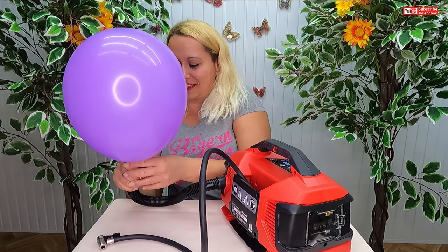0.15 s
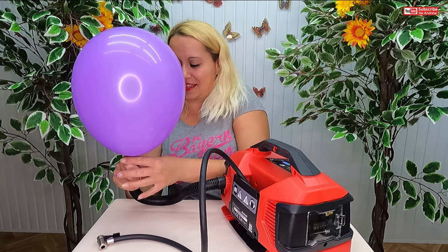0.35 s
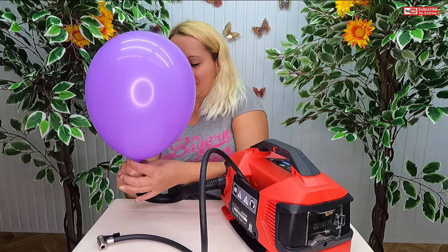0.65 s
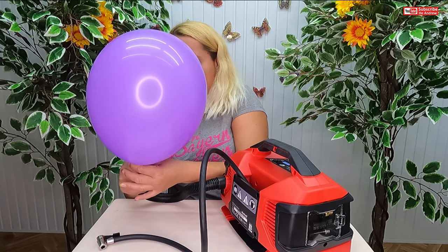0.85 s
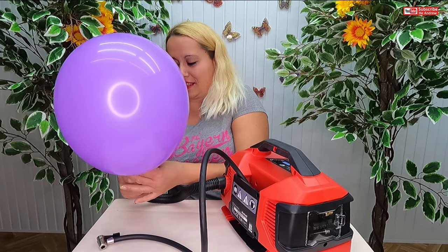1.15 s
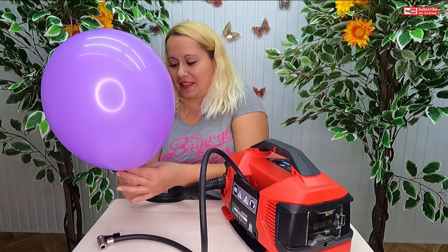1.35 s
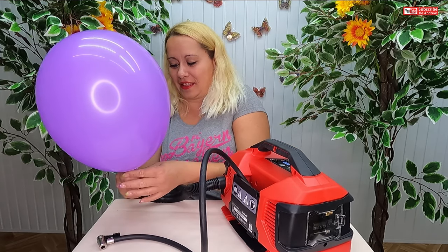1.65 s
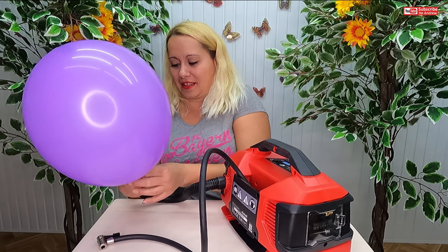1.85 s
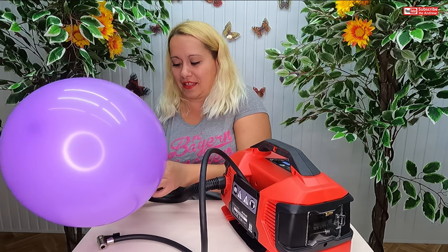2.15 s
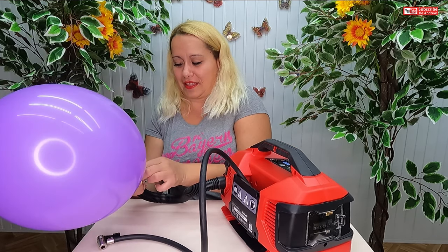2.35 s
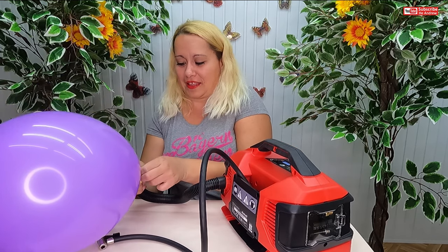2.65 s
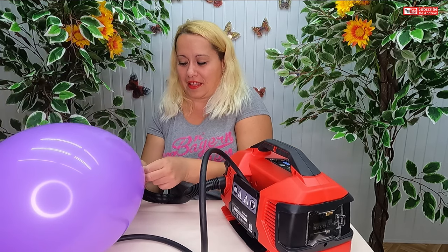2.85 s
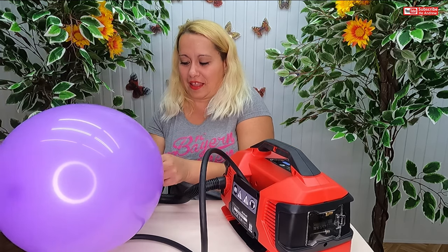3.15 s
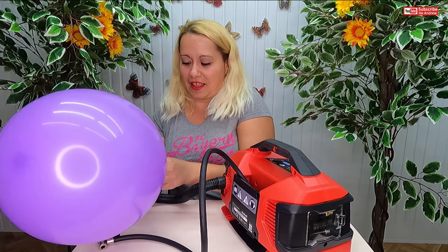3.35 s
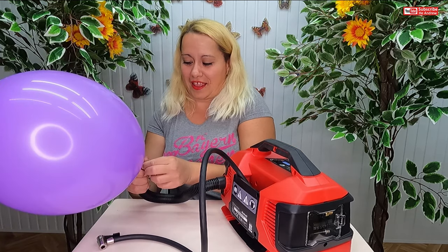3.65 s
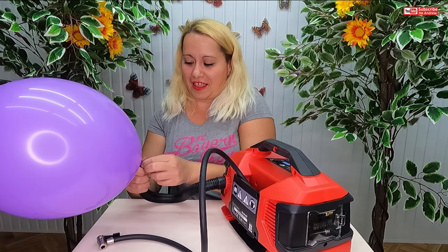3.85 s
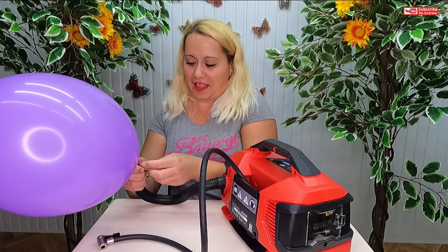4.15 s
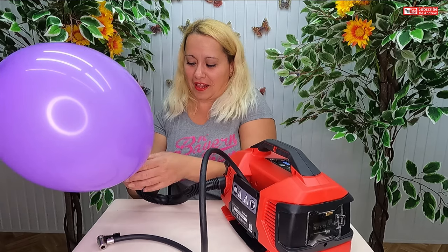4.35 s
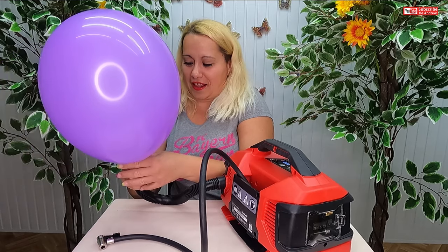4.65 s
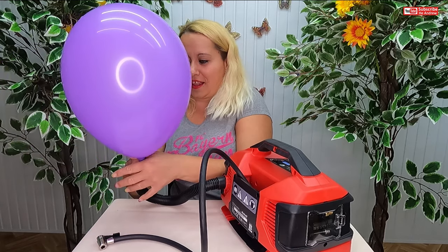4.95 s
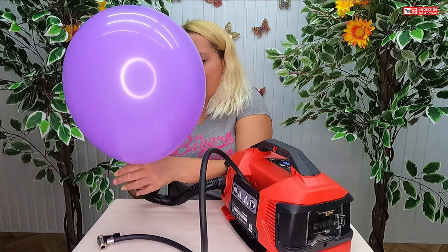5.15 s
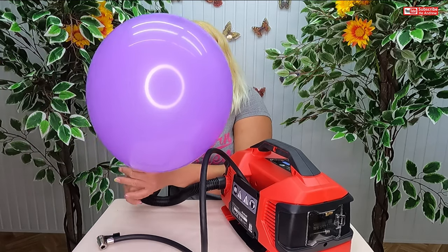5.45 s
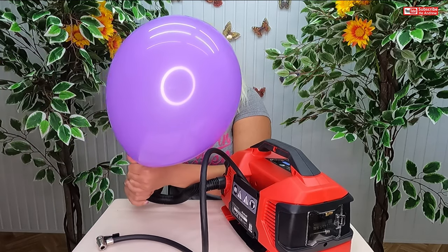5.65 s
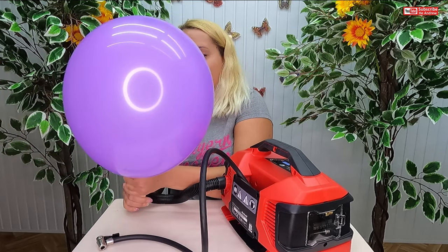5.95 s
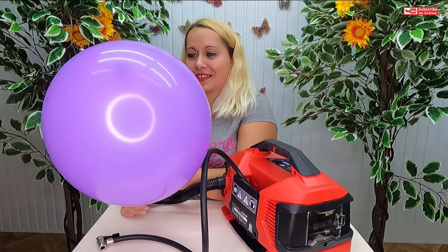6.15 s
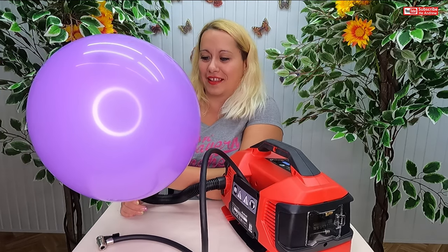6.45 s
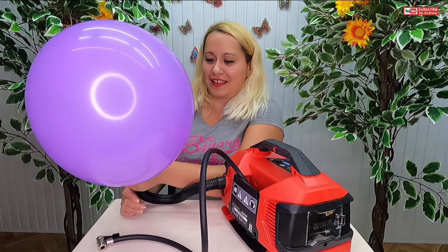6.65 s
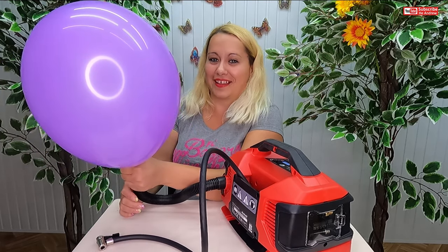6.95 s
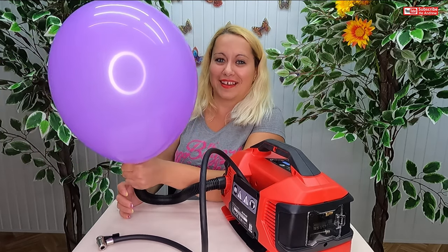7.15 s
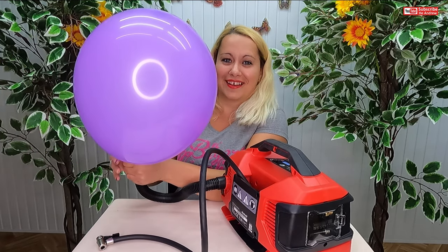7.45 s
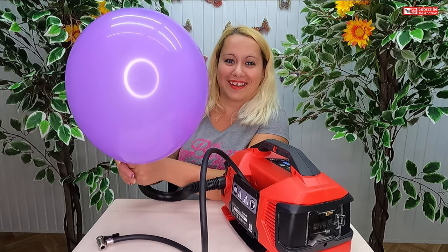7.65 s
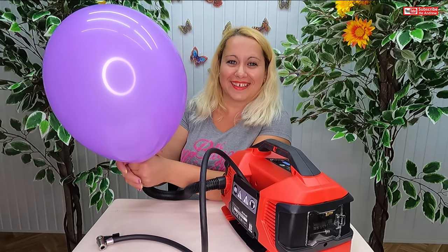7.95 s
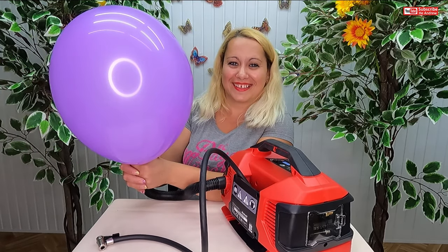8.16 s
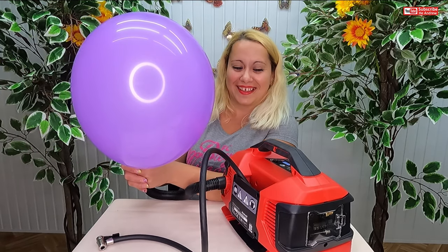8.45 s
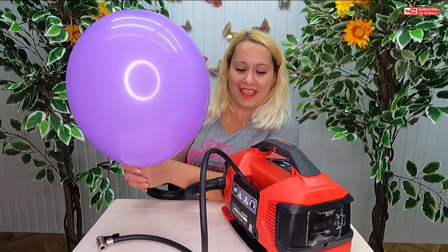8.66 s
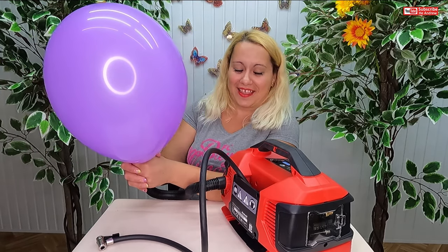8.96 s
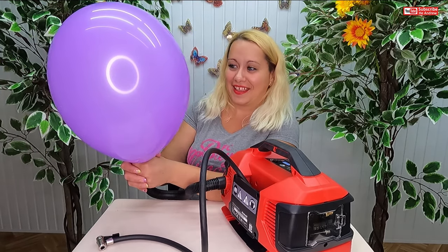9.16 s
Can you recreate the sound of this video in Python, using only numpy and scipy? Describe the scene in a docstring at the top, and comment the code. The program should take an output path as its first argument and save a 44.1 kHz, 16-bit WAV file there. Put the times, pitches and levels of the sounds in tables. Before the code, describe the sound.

From 0 to about 9.3 seconds an electric blower pump runs without a break on a table indoors, inflating a balloon. A dense, hollow roar of air, strongest in the low middle range, carries a steady motor hum near 336 Hz with rough overtones. Above it sits a thin whine near 2.7 kHz and a more piercing one near 8 kHz, wavering in strength: strong around 3.4 and 5.2 seconds, briefly dropping near 5.4, 6.6 and 7.3. From about 2.7 seconds the pitch creeps up almost imperceptibly. Faint neck hiss ebbs and returns, clearest around 2.3 to 4.5 and 6.4 to 6.7 seconds. Very soft, dull bumps fall near 1.5, 2.1, 3.4, 5 and 5.6, the fullest at 6.3 seconds. The sound is close, centred and nearly mono, with no fade or shutdown.

```python
"""A cordless blower pump runs on a table indoors and fills a latex balloon through a wide hose.
Its shaft hums and its eight-bladed impeller whines: tones tied to one shaft speed.
Air roars through housing and hose: noise shaped by resonances and by reflections off the table.
The swaying balloon reflects and shades the sound, hisses at its neck and bumps softly now and then."""
import sys
import numpy as np
from scipy import signal
from scipy.fft import rfft, irfft
from scipy.io import wavfile
from scipy.ndimage import uniform_filter1d

SR = 44100
rng = np.random.default_rng(int(sys.argv[2]) if len(sys.argv) > 2 else 0)


def master_out(mix):
    """Clip the mix to full scale and print it as 16-bit PCM to the path in sys.argv[1]."""
    frames = np.transpose(np.atleast_2d(mix))
    ceiling = np.clip(frames, -1, 1)
    pcm = np.round(ceiling * 32767).astype(np.int16)
    wavfile.write(sys.argv[1], SR, pcm)


N = 410571
TIME = np.arange(N) / SR  # seconds

# soft bumps of balloon and hose; the sway level is the one its fading starts from:
# (time [s], sway level [dB], sway pitch [Hz], sway decay [s], strongest thud [dB])
BUMP_EVENTS = [(1.46, -78, 50, .02, -75), (2.14, -65, 5.5, .15, -86), (3.36, -61, 18, 0.1, -84),
               (4.86, -77, 32, .08, -79), (5.03, -68, 15, .15, -86), (5.57, -63, 20, 0.046, -67),
               (5.64, -69, 20, .06, -71), (6.28, -53, 18, 0.13, -65)]
# air slipping past the neck of the balloon as the grip of the fingers changes: (time [s], level change [dB])
NECK_LEAK = [(0, 2), (.3, -25), (1.7, -7), (2.35, 3.5), (2.55, -13), (2.85, 1), (3.55, -9), (3.7, 1),
             (4, -5), (4.3, 1), (4.7, -20), (5.5, -4), (5.85, -16), (6.35, 0.5), (6.65, 1.5), (6.9, -11),
             (8, -18), (9.3, -13)]
# basic colour of that hiss: (frequency [Hz], level [dB per Hz])
NECK_LEAK_COLOUR = [(1000, -125), (4000, -108), (5700, -100), (7500, -103), (9700, -101), (11000, -110),
                    (15500, -114)]
# basic colour of the air rushing through the pump: (frequency [Hz], level [dB per Hz])
RUSH_COLOUR = [(30, -112), (90, -113), (125, -106), (170, -87), (265, -84), (385, -92.5), (550, -78.5),
               (730, -83.5), (1200, -93), (2200, -101), (5200, -103.5), (9000, -103), (11000, -109),
               (15500, -116)]
# resonances of housing and hose, and notches from reflections off the table:
# (frequency [Hz], width [Hz], lift [dB])
PEAKS_AND_NOTCHES = [(830, 35.3, 14.5), (960, 50, -1), (1077, 200, 11), (1205, 63, -7), (1393, 52, 10.5),
                     (1467, 35, -5), (1546, 37, 0), (1667, 43, 13.5), (1760, 21, 4), (1920, 54, -6.5),
                     (2000, 50, 4.5), (2180, 58, -8.5), (2360, 120, 2.5), (2782, 51, 8), (3540, 260, 8.5),
                     (3960, 34, 15), (4265, 65, 8), (4596, 460, 8.5), (5300, 220, -2), (5800, 143, 13.5),
                     (7380, 150, 8.5), (8440, 690, 7.5)]
# the balloon shades the rush, which turns hollow: (time [s], amount before weighting [dB])
BALLOON_SHADE = [(0, -5), (3, -3), (4.6, -6.5), (8.3, -0.5), (9.3, -2)]
# the balloon's angle on the nozzle tips the hiss between two resonances:
# (time [s], amount towards the lower one, before weighting [dB])
BALLOON_TIP = [(0, 4.5), (1.6, 3.5), (2.2, -1), (4.3, -2), (4.7, 7), (5.3, 5.5), (6.3, -7), (7.6, -0.5),
               (9.3, -2.5)]
# strength of the roar in the hose: (time [s], level change [dB])
HOSE_ROAR = [(0, -1), (1.8, -0.2), (3.5, -2), (5.8, -0.5), (6.5, -2.5), (7.3, -1), (9.3, -0.5)]
# overtones of the motor: (multiple of the shaft speed, rms level before fading [dB])
MOTOR_OVERTONES = [(2, -69.5), (3, -64.5), (4, -70.5), (5, -66), (6, -76), (7, -74), (9, -66.5),
                   (10, -75.5), (13, -77.5), (15, -77.5), (17, -80.5), (21, -82.5), (28, -82), (34, -88.5),
                   (35, -81), (37, -79), (38, -87), (39, -84), (45, -82.5)]
# blade-tone harmonics 1 to 3, swelling and fading as the balloon shifts its reflections:
# (time [s], rms level [dB])
WHINE_FIRST = [(0.0, -60.5), (0.18, -56.4), (0.36, -62), (1.26, -58), (1.9, -63.5), (3.32, -63.5),
               (3.68, -58), (4.42, -55), (4.72, -65), (4.9, -61), (5.3, -70.6), (5.52, -54), (6.68, -61.8),
               (6.8, -75), (7.04, -57.9), (7.44, -55.5), (8.5, -62.5), (9.3, -55.0)]
WHINE_SECOND = [(0.0, -64.2), (0.36, -77), (0.7, -58.5), (0.94, -86), (1.58, -63.7), (2.7, -57.5),
                (2.94, -65.0), (5.48, -67.5), (5.54, -78.1), (6.44, -68.5), (6.78, -71), (7.12, -61),
                (8.76, -64.0), (9.3, -64.5)]
WHINE_THIRD = [(0.0, -49), (0.98, -50.5), (1.06, -58), (1.64, -46.5), (2.78, -49.9), (3.36, -43.5),
               (4.12, -46.5), (4.4, -52.7), (4.52, -49), (4.64, -57), (4.74, -47.5), (5.2, -42.9),
               (5.42, -64), (5.62, -45.5), (5.8, -54.4), (6.64, -60.5), (6.88, -47), (7.26, -67),
               (7.42, -49.5), (7.54, -55.5), (7.64, -46), (8.44, -50), (9.0, -46), (9.3, -56)]
# harmonics 4 and 5, which sink as the balloon grows: one starting rms level each [dB], before swells
TOP_WHINE_START_DB = [-66.5, -65]
# the part of each harmonic scattered by the moving balloon: one rms level each [dB], harmonics 1 to 5
SCATTER_LEVELS_DB = [-76.5, -73, -64, -71.5, -74]

BLADES = 8
# the shaft holds its speed (turns per second), then gains slowly as the balloon fills
SHAFT_HZ, RISE_FROM_S, RISE_HZ_PER_S = 335.8, 2.7, 0.37
HUM_DB, HUM_RISE_DB_PER_S = -57, 0.21  # hum of the unbalanced rotor, rms level halfway through
TOP_SINK_DB_PER_S, TOP_SWELL_DB, TOP_SWELL_HZ = 1.17, 4, 0.82
SCATTER_HZ = 1  # flicker rate per harmonic number: shorter waves flicker faster
EDGE_HZ = 15720  # upper limit of the sound


def amp(db):
    """Turns decibels into a gain."""
    return 10 ** (np.asarray(db) / 20)


def evened(x):
    """Scales a signal to an rms of 1."""
    return x / np.sqrt(np.mean(x ** 2) + 1e-20)


def curve(rows, t=TIME):
    """Joins (time, value) rows by straight lines."""
    return np.interp(t, *np.transpose(rows))


def colour(points, hz):
    """Reads a spectrum, joining its points on a logarithmic frequency axis."""
    point_hz, db = np.transpose(points)
    return np.interp(np.log(hz + 1), np.log(point_hz), db)


def bell(hz, centre_hz, width):
    """Shape of a resonance: 1 at its centre, a half at half its width (Hz) to either side."""
    return 1 / (1 + (2 * (hz - centre_hz) / width) ** 2)


def wander(rate):
    """Smooth random signal of rms 1 that changes about rate times a second."""
    hz = np.fft.rfftfreq(N, 1 / SR)
    spectrum = rfft(rng.standard_normal(N)) / np.sqrt(1 + (hz / rate) ** 4)
    return evened(irfft(spectrum, N))


def partial(angle, db, flutter, rate):
    """A tone whose strength and phase are shaken by turbulent air."""
    shake = 1 + flutter * (wander(rate) + 1j * wander(rate))
    start = 2 * np.pi * rng.random()
    tone = (shake * np.exp(1j * (angle + start))).real
    return np.sqrt(2) * amp(db) * tone / np.sqrt(1 + 2 * flutter ** 2)  # keeps the rms level at db


def turbulence(level_db, patchy_db, ripple_db, size=2048):
    """Noise shaped by level_db(t, hz); the room ripples it, and moving things make patches drift."""
    hop = size // 4
    t = np.arange(N // hop + 3)[:, None] * hop / SR
    hz = np.fft.rfftfreq(size, 1 / SR)
    real, imag, patches = rng.standard_normal((3, len(t), len(hz)))
    patches = uniform_filter1d(patches, size=60, axis=0)  # smooth over time
    patches = evened(uniform_filter1d(patches, size=6, axis=1))  # and over frequency
    ripple = evened(uniform_filter1d(rng.standard_normal(len(hz)), size=3))
    uneven_db = (patchy_db * patches + ripple_db * ripple) * hz / (hz + 900)  # long waves disturbed least
    spectra = (real + 1j * imag) * amp(level_db(t, hz) + uneven_db)
    noise = signal.istft(spectra.T, nperseg=size, noverlap=size - hop)[1][:N]
    return noise * np.sqrt(3 * SR / (2 * size))  # makes the levels count per Hz


def bumps():
    """Each bump of balloon or hose is a dull thud and a deep, dying sway."""
    out, rumble = np.zeros(N), wander(65)
    for start, sway_db, sway_hz, decay, thud_db in BUMP_EVENTS:
        age = np.maximum(TIME - start, 0)
        out += amp(sway_db) * np.sin(2 * np.pi * sway_hz * age) * np.exp(-age / decay)
        push = age / 0.01  # the thud is strongest after 0.01 s
        out += amp(thud_db) * rumble * push * np.exp(1 - push)
    return out


def leak_db(t, hz):
    """Air hisses out at the balloon's neck, following the grip of the fingers."""
    return colour(NECK_LEAK_COLOUR, hz) + curve(NECK_LEAK, t)


def rush_db(t, hz):
    """Air roars through housing and hose, partly behind the balloon, with reflections off the table."""
    level = colour(RUSH_COLOUR, hz)
    level = level + sum(db * bell(hz, centre, width) for centre, width, db in PEAKS_AND_NOTCHES)
    # negative shade dips the sound near 1058 Hz and lifts it near 2000 and 15100 Hz
    hollow = 1.88 * bell(hz, centre_hz=1058, width=320) - 1.0 * bell(hz, centre_hz=2000, width=1230)
    treble = -0.8 * bell(hz, centre_hz=15100, width=3000)
    tipped = bell(hz, centre_hz=4560, width=350) - 1.1 * bell(hz, centre_hz=5850, width=200)
    roar = bell(hz, centre_hz=810, width=490)
    level = level + curve(BALLOON_SHADE, t) * (hollow + treble)
    return level + curve(BALLOON_TIP, t) * tipped + curve(HOSE_ROAR, t) * roar


def shaft_angle():
    """The shaft speeds up a little as the flow drops, and wavers."""
    hz = SHAFT_HZ + RISE_HZ_PER_S * np.maximum(TIME - RISE_FROM_S, 0)
    waver_hz = 0.12 * wander(2.43)
    return 2 * np.pi * np.cumsum(hz + waver_hz) / SR


def motor(angle):
    """A steady hum once a turn, with rougher overtones; short waves fade most as the balloon moves."""
    hum_db = HUM_DB + HUM_RISE_DB_PER_S * (TIME - TIME.mean())
    out = partial(angle, hum_db, flutter=0.032, rate=4.1)
    for multiple, db in MOTOR_OVERTONES:
        fading_db = (1 + 0.04 * multiple) * wander(1.3)
        out += partial(multiple * angle, db + fading_db, flutter=0.087, rate=17)
    return out


def impeller(angle):
    """Blades chop the air into a thin, high whine; each harmonic beats with its own scattered copy."""
    levels_db = [curve(WHINE_FIRST), curve(WHINE_SECOND), curve(WHINE_THIRD)]
    for start_db in TOP_WHINE_START_DB:
        swell_db = TOP_SWELL_DB * wander(TOP_SWELL_HZ)
        levels_db.append(start_db - TOP_SINK_DB_PER_S * TIME + swell_db)
    out = np.zeros(N)
    for harmonic, (db, scatter_db) in enumerate(zip(levels_db, SCATTER_LEVELS_DB), 1):
        blade_angle = harmonic * BLADES * angle
        rate = harmonic * SCATTER_HZ
        out += partial(blade_angle, db, flutter=0.082, rate=15.5)
        scattered = wander(rate) * np.cos(blade_angle) + wander(rate) * np.sin(blade_angle)
        out += amp(scatter_db) * scattered
    return out


def scene():
    """All pump parts follow one shaft; the sound sits in the middle, the two channels nearly identical."""
    angle = shaft_angle()
    rush = turbulence(rush_db, patchy_db=2.5, ripple_db=2.14)
    leak = turbulence(leak_db, patchy_db=3, ripple_db=-0.3)
    # the flow pulses a little with each turn and flickers at random
    air = (rush + leak) * (1 + 0.036 * np.cos(angle) + 0.064 * wander(40))
    middle = bumps() + air + motor(angle) + impeller(angle)
    # inaudible noise, opposite in the two channels
    side = amp(-50.5) * turbulence(rush_db, patchy_db=8.0, ripple_db=5.5)
    side += amp(-108) * wander(60)  # inaudible low noise
    return np.array([middle + side, middle - side])


def record(dry):
    """Cuts away the treble above the upper limit with a steep filter."""
    lowpass = signal.firwin(1023, EDGE_HZ, window=("kaiser", 9), fs=SR)
    return signal.oaconvolve(dry, lowpass[None], "same", axes=1)


dry = scene()
out = record(dry)
master_out(out)
```